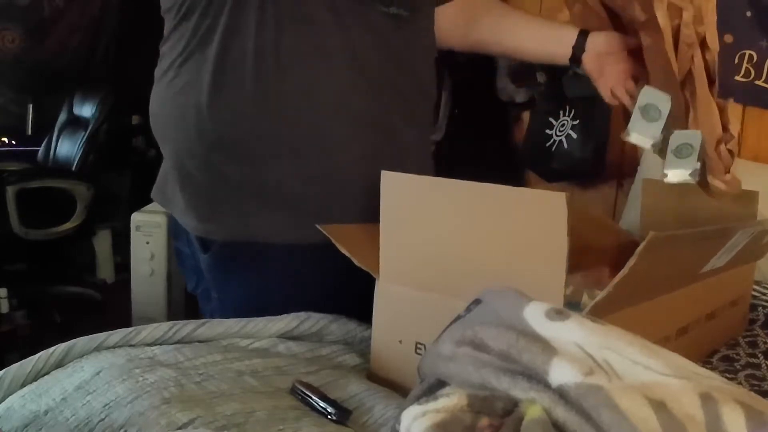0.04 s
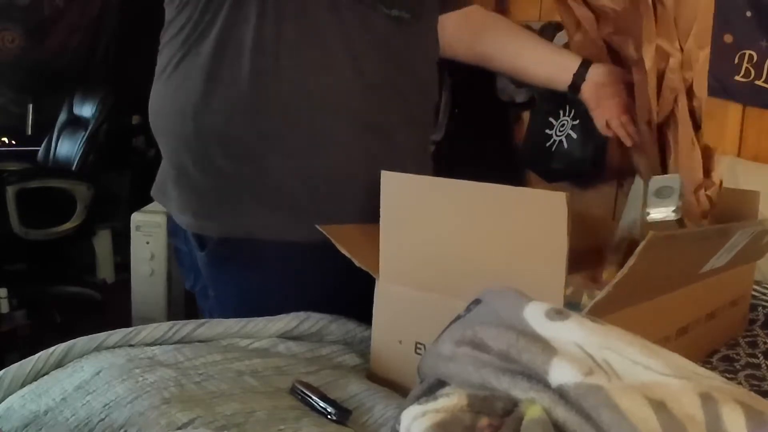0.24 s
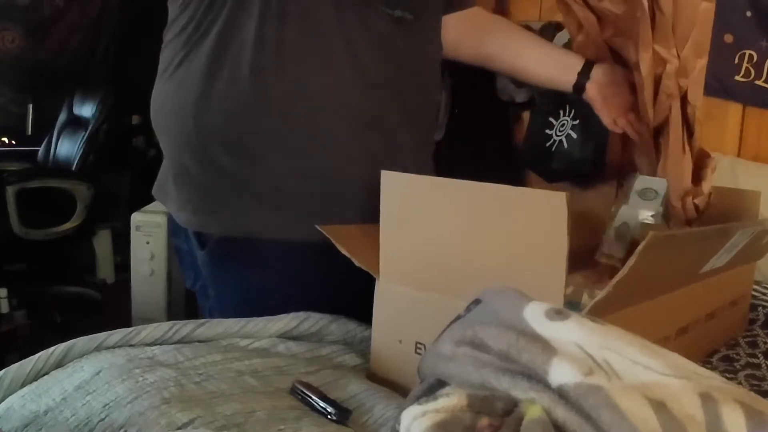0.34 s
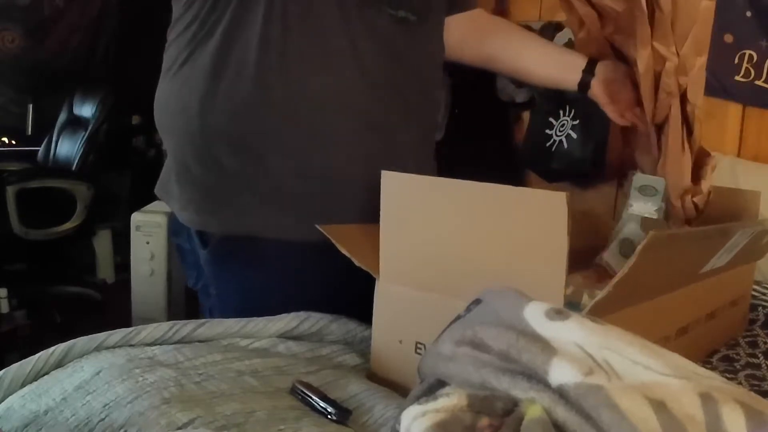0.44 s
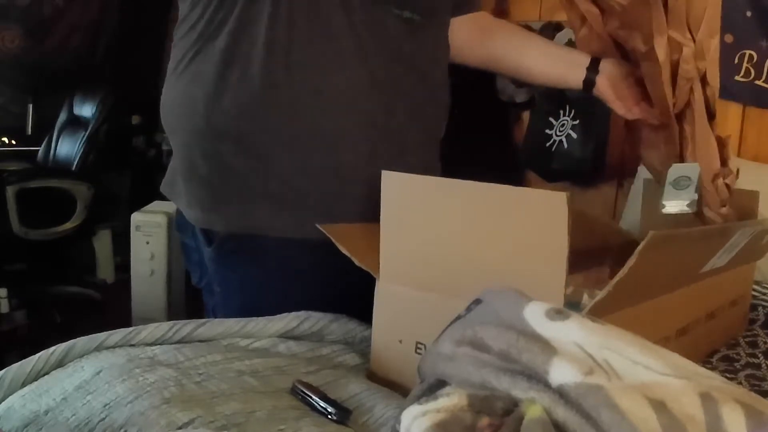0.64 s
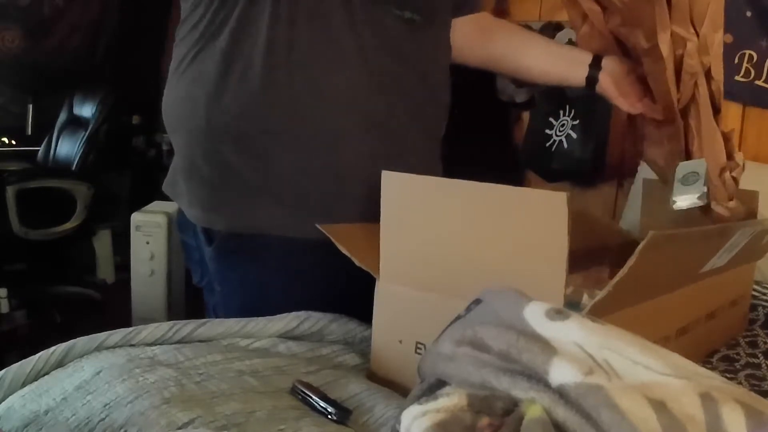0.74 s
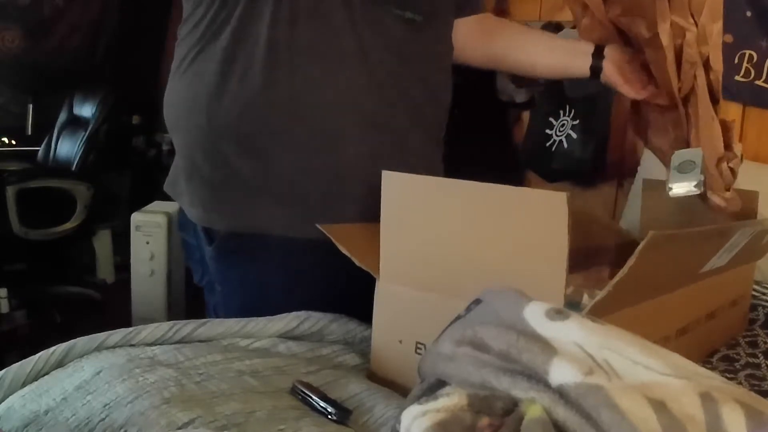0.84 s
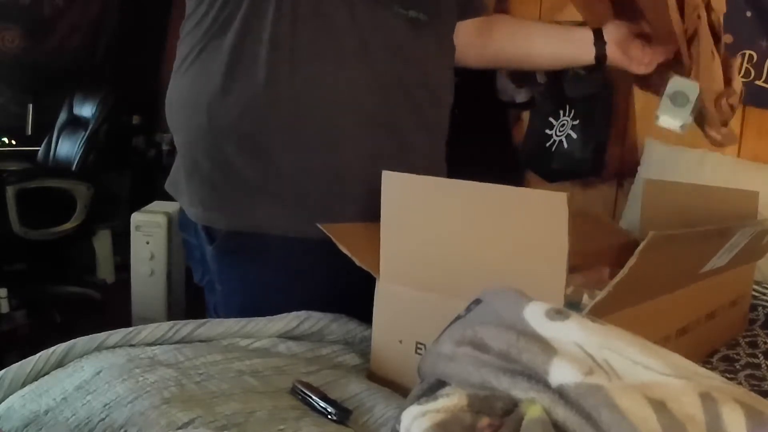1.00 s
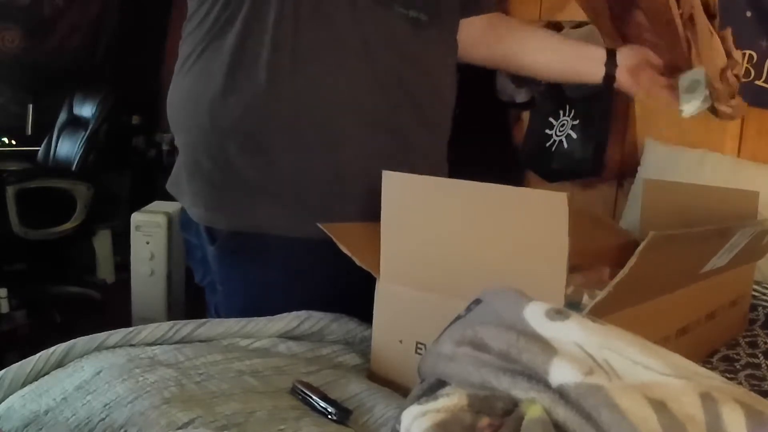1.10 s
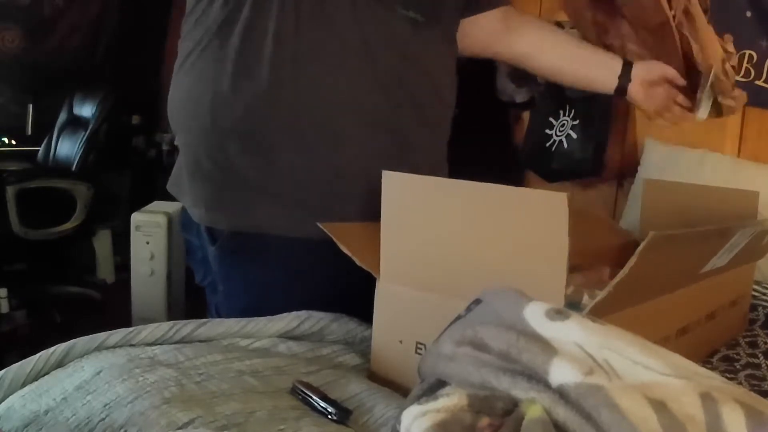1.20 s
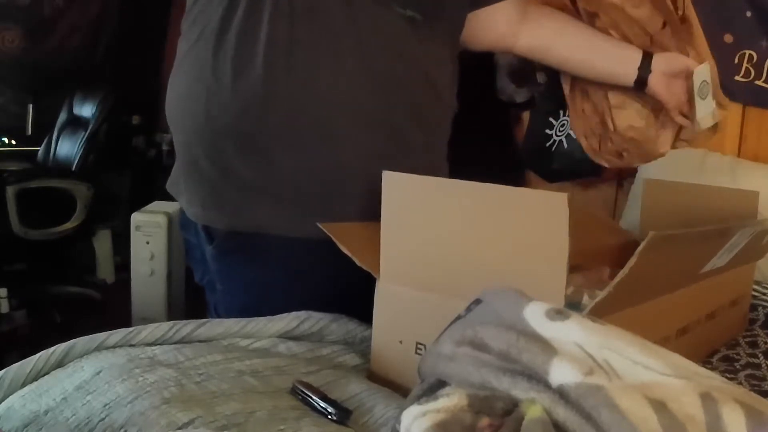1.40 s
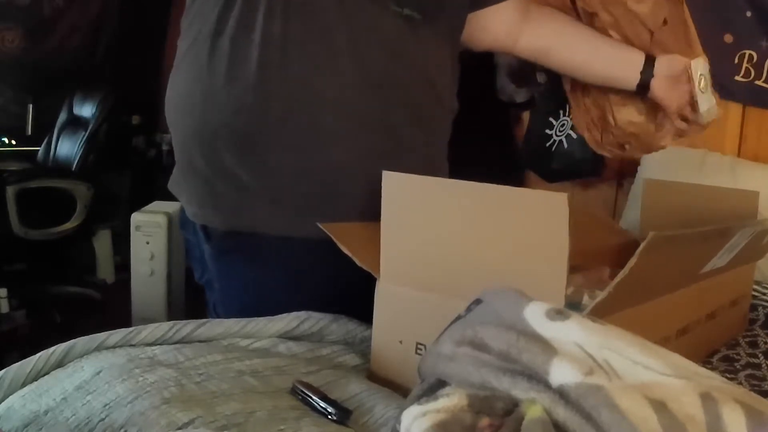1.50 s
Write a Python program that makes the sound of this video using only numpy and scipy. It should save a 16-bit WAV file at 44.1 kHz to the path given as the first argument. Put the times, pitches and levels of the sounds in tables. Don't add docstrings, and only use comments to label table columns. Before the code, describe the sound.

Brown packing paper rustles and crackles as it is pulled from a cardboard box, with dull knocks

```python
import sys
import numpy as np
from scipy import signal
from scipy.io import wavfile

SR = 44100
rng = np.random.default_rng(int(sys.argv[2]) if len(sys.argv) > 2 else 0)


def transcribe(u):
    v = np.clip(np.atleast_2d(u).T, -1, 1)
    q = np.round(v * 32767).astype(np.int16)
    wavfile.write(sys.argv[1], SR, q)


def gain_from_db(level_db):
    decades = np.asarray(level_db, float) / 20
    return 10 ** decades


N = 68355


def rms_one(x):
    return x / np.sqrt(np.mean(x ** 2) + 1e-20)


def at_hz(points, hz):
    table = np.array(points)
    return np.interp(np.log(hz), np.log(table[:, 0]), table[:, 1])


def clicks(start_s, gain):
    out = np.full(N, 1e-18)
    np.add.at(out, (np.asarray(start_s) * SR).astype(int), gain)
    return out


def ring(x, hz, t60):
    radius = gain_from_db(-60 / (t60 * SR))
    angle = 2 * np.pi * hz / SR
    return signal.lfilter([0, np.sin(angle)], [1, -2 * radius * np.cos(angle), radius * radius], x)


def fade(x, t60):
    return signal.lfilter([1], [1, -gain_from_db(-60 / (t60 * SR))], x)


def bandpass(x, low_hz, high_hz):
    return signal.sosfilt(signal.butter(2, [low_hz, high_hz], "band", fs=SR, output="sos"), x)


def highpass(x, hz):
    return signal.sosfilt(signal.butter(2, hz, "high", fs=SR, output="sos"), x)


def bands(low_hz):
    edges = low_hz * 2 ** np.arange(0, np.log2(17000 / low_hz), 0.5)
    settle = 4000
    white = rng.standard_normal((2, N + settle))
    for k, low in enumerate(edges):
        noise = bandpass(white[k % 2], low, min(low * 2 ** 0.5, 0.45 * SR))
        yield low * 2 ** 0.25, noise[settle:]


def drift(rate_hz):
    r = np.exp(-2 * np.pi * rate_hz / SR)
    slow = signal.lfilter([1], [1, -2 * r, r * r], rng.standard_normal(N + 20000))[20000:]
    return rms_one(slow - slow.mean())


# start_s [s], length_s [s], level_db [dB], brightness [dB per octave]
PULL_STROKES = [(-.05, 0.049, -55, -3), (0.05, 0.3, -72.5, -7), (0.293, 0.026, -61, -0.5),
                (0.423, 0.061, -63.5, -3), (0.845, 0.097, -64, 0), (0.919, 0.092, -63, 0),
                (1.022, 0.083, -61.5, 3), (1.086, 0.046, -56.5, 0.5), (1.211, 0.072, -67.5, 0),
                (1.259, 0.077, -57, 0), (1.332, 0.067, -59.5, -2), (1.41, 0.056, -59.5, 3),
                (1.462, 0.056, -63.5, 0.5)]


def pull():
    rise_s, t60_s, resting_db = 0.031, 0.19, -75
    start_s, length_s, level_db, brightness = (c[:, None] for c in np.transpose(PULL_STROKES))
    t = np.arange(N) / SR - start_s
    decay_db = 60 * np.clip(t - length_s, 0, 2) / t60_s
    gain = gain_from_db(level_db - decay_db) * np.clip(t / rise_s, 0, 1)
    total = gain.sum(axis=0) + gain_from_db(resting_db)
    return total, (gain * brightness).sum(axis=0) / total


# frequency_hz [Hz], density_db [dB per Hz]
PAPER_COLOUR = [(200, -7.5), (500, 0.5), (1100, 2), (2000, -2.5), (3400, -4), (5500, -30), (10000, -20),
                (15500, -28.5)]


def paper():
    grains_per_s, grain_spread_db, grain_cycles, clump_db = 4000, 2, 4.35, 1.5
    slide_db, slide_flutter_db = -3, 1.5
    gain, tilt = pull()
    sizes = gain_from_db(grain_spread_db * np.minimum(rng.exponential(1, N), 4)) * rng.choice([-1, 1], N)
    born = rng.random(N) < grains_per_s * gain_from_db(clump_db * drift(30)) / SR
    pitches_hz = np.geomspace(400, 14000, 24)
    dealt = rng.integers(0, 24, N)
    grains = np.zeros(N)
    for k, hz in enumerate(pitches_hz):
        octaves = np.log2(hz / 2000)
        colour_db = at_hz(PAPER_COLOUR, hz) + 20 * np.log10(hz / 2000) + tilt * octaves
        grains += gain_from_db(colour_db) * ring(sizes * born * (dealt == k) + 1e-18, hz, grain_cycles / hz)
    together = drift(16.0)
    slide = np.zeros(N)
    for hz, noise in bands(200.2):
        colour_db = at_hz(PAPER_COLOUR, hz) + tilt * np.log2(hz / 2000)
        flutter_db = slide_flutter_db * together + 4.5 * drift(23)
        slide += gain_from_db(colour_db + flutter_db) * noise
    return gain * gain_from_db(-4) * (rms_one(grains) + gain_from_db(slide_db) * rms_one(slide))


# frequency_hz [Hz], density_db [dB per Hz]
FLOOR_COLOUR = [(20, 3.5), (50, -7.5), (120, -16), (300, -23.5), (800, -33), (3000, -38), (8000, -45),
                (15500, -39)]
# start_s [s], level_db [dB]
BOX_SHIFT = [
    (0.8, -103),
    (0.826, -60),
    (0.9, -65),
    (0.918, -78),
    (1.328, -54.5),
    (1.40, -62.5),
    (1.51, -60),
    (1.545, -83),
]


def room_tone():
    t = np.arange(N) / SR
    floor = rms_one(sum(gain_from_db(at_hz(FLOOR_COLOUR, hz)) * noise for hz, noise in bands(21.26)))
    hum = gain_from_db(-64 + 0.4 * drift(11)) * np.sin(2 * np.pi * 120 * t)
    rumble = rms_one(bandpass(rng.standard_normal(N), 25, 85))
    rumble_db = np.interp(t, *np.transpose(BOX_SHIFT)) - 4.0
    return gain_from_db(-62) * floor + hum + gain_from_db(rumble_db) * rumble


# start_s [s], level_db [peak dB], pitch_hz [Hz], spray_s [s]
SNAPS = [(.083, -53, 1710, 0.06), (0.1217, -45.5, 2670, 0.087), (.1197, -61, 10260, .03),
         (.214, -63, 8800, 0.093), (.226, -55, 8800, 0.1), (.245, -50.5, 7860, 0.052),
         (0.315, -58, 8100, 0.016), (.44, -47.5, 1430, 0.059), (0.453, -50, 2260, 0.043),
         (.483, -52.5, 3150, .03), (0.676, -61, 8100, .05), (0.87, -61.5, 2770, 0.19),
         (0.874, -64, 1120, 0.021), (.902, -52, 1320, 0.026), (.534, -72, 8500, .03),
         (.534, -61, 2570, 0.027), (.001, -64, 5070, 0.037), (.927, -55, 3590, .02),
         (0.9345, -44, 2310, 0.019), (0.9379, -42.5, 2020, 0.027), (0.971, -50.5, 1170, 0.019),
         (0.962, -43, 1500, 0.046), (.99, -57, 2960, 0.045), (1.03, -57.5, 1110, 0.035),
         (1.055, -62, 1660, 0.022), (1.055, -55.5, 7800, .05), (1.075, -52.5, 1300, 0.042),
         (1.117, -50, 1500, 0.018), (1.127, -50, 1180, 0.041), (1.101, -56, 8500, 0.033),
         (1.103, -56, 2930, 0.16), (1.112, -60, 10500, .08), (1.124, -55.5, 11400, 0.11),
         (1.127, -54, 2930, 0.074), (1.212, -51, 1250, 0.055), (1.213, -54.5, 3200, 0.053),
         (1.259, -56, 1290, .03), (1.275, -54, 2530, 0.028), (1.295, -49.5, 1960, 0.05),
         (1.319, -53, 1500, 0.017), (1.352, -52, 1170, 0.046), (1.318, -57, 8900, 0.033),
         (1.441, -45.5, 1900, 0.044), (1.4555, -42, 2360, 0.055), (1.50, -85, 9000, .04),
         (1.518, -60, 9000, 0.022), (0.2144, -42, 3220, 0.046), (0.3743, -51.5, 3720, 0.026),
         (0.6498, -48, 3460, 0.048), (1.463, -52.5, 1500, .04)]


def snaps():
    cycles, spray_db, span, tick_db = 6.5, -6.5, 1.72, -2
    out = np.zeros(N)
    for start_s, level_db, pitch_hz, spray_s in SNAPS:
        hit = clicks([start_s], gain_from_db(level_db))
        low_hz, high_hz = pitch_hz / span, min(pitch_hz * span, 16000)
        spray = rms_one(bandpass(rng.standard_normal(N), low_hz, high_hz))
        body = ring(hit, pitch_hz, cycles / pitch_hz) + gain_from_db(spray_db) * spray * fade(hit, spray_s)
        out += bandpass(body, low_hz, high_hz)
        out += gain_from_db(tick_db) * ring(hit, min(2 * pitch_hz, 15000), 2.1 / pitch_hz)
    return out


def clinks(start_s, level_db, modes, share_db):
    out = np.zeros(N)
    for k, (hz, mode_db, t60) in enumerate(modes):
        hits = clicks(start_s, gain_from_db(level_db + mode_db + share_db[:, k]))
        out += gain_from_db(3 * drift(60)) * ring(hits, hz, t60)
    return out


# frequency_hz [Hz], level_db [dB], t60_s [s]
JAR_MODES = [(1320, -37, 0.03), (1500, -5, 0.055), (2430, -24, 0.048), (2466, -4, 0.099),
             (2770, -0.5, 0.13), (2733, -7.5, 0.087), (3630, -9.5, 0.048), (3620, -4.5, 0.044),
             (4270, -32, 0.025), (5560, -43, .06), (9350, -16, 0.015), (10470, -20.5, 0.065)]
# start_s [s], level_db [peak dB]
JAR_STRIKES = [
    (.1200, -43),
    (.128, -49.5),
    (0.215, -45.5),
    (0.319, -61.5),
]


def jar():
    start_s, level_db = np.transpose(JAR_STRIKES)
    share_db = -5 + 0.92 * rng.normal(0, 1, (len(start_s), len(JAR_MODES)))
    return clinks(start_s, level_db, JAR_MODES, share_db)


# start_s [s], level_db [peak dB], pitch_hz [Hz], swing_cycles [cycles], crack_db [dB]
BOX_KNOCKS = [(0.2132, -19.5, 120.4, 1.72, -33), (0.2138, -24.5, 240, 3.44, -19.5),
              (0.2128, -35.5, 935, 3.4, -30), (.2195, -26, 557, 2.52, -15.5), (0.2196, -31, 910, 2.96, -23),
              (0.231, -32, 414, 3.56, -19.5), (0.237, -30, 132, 1.77, -18.5), (0.244, -37, 390, 2.4, -23),
              (.257, -40.5, 216, 3.53, -13), (0.277, -41, 168, 1.2, -18), (0.2984, -36.5, 323, 1.5, -30),
              (0.3045, -35.5, 386, 2.08, -30), (0.3753, -33, 324, 0.9, -7.5),
              (0.382, -39.5, 480, 0.79, -10.5), (0.3828, -44, 300, 1.36, -21),
              (0.391, -49.5, 294, 1.73, -20), (0.4, -56, 410, 3.5, -30),
              (0.5327, -24.5, 206.3, 1.32, -29.5), (.5332, -39.5, 917, 3.2, -13.5),
              (0.5363, -35, 494, 2.66, -20.5), (0.5446, -36.5, 158.5, 1.6, -15.5),
              (0.546, -44, 960, 4.5, -32), (0.56, -40, 200, 1.07, -18), (0.5654, -39, 236, 0.92, -25),
              (0.566, -42.5, 397, 1.8, -17), (0.65, -22.5, 285, 1.75, -15.5),
              (.6573, -26.5, 229, 1.14, -41), (0.6554, -28.5, 401, 2.65, -26.5),
              (0.6546, -35, 930, 6, -8.5), (0.666, -37.5, 237, 2.07, -49), (.675, -36.5, 365, 2.4, -40),
              (0.685, -40.5, 250, 1.5, -49), (.701, -40, 220, 2.2, -44)]
# frequency_hz [Hz], level_db [dB], t60_s [s]
BOX_MODES = [(111, 17.5, 0.024), (141, -6.5, 0.1), (196, -1, 0.082), (239.9, 3.5, 0.14), (300, -17, 0.14),
             (344, 5.5, 0.051), (394.8, 3, 0.11), (480, -0.5, 0.08), (551, -7, 0.11), (605, -1.5, 0.14),
             (716, 2.5, 0.066), (850, 4, 0.07), (843, -3, 0.091), (974, -9.5, 0.16)]
# frequency_hz [Hz], density_db [dB per Hz]
CRACK_COLOUR = [(290, -29), (500, -9), (646, -10.5), (949, -11.5), (2390, -18.5), (3670, -27.5),
                (4290, -40.5), (15000, -49)]
# frequency_hz [Hz], t60_s [s]
CRACK_DECAY = [(500, 0.15), (2000, 0.093), (6000, 0.24), (14000, 0.056)]


def knocks():
    swing_edge_s, swing_loss_db, low_share = 0.00076, -1, 0.38
    afterring_db, reach_oct = -16, 0.62
    wobble_hz, wobble_db = 35, 4.0
    crack_rise_s, crack_s, crack_tail_db = 0.00045, 0.0034, -10
    start_s, level_db, pitch_hz, cycles, crack_db = np.transpose(BOX_KNOCKS)

    t = np.arange(N) / SR - start_s[:, None]
    phase_cycles = t * pitch_hz[:, None]
    overtime_s = np.clip(t - (cycles / pitch_hz)[:, None], 0, 1)
    envelope = np.exp(-overtime_s / swing_edge_s) * (t > 0)
    envelope = envelope * gain_from_db(level_db[:, None] + swing_loss_db * np.clip(phase_cycles, 0, 10))
    swing = -envelope * np.sin(2 * np.pi * phase_cycles)
    out = sum(highpass(row, low_share * hz) for hz, row in zip(pitch_hz, swing))

    chance = rng.normal(0, 1, (len(start_s), len(BOX_MODES)))
    ring_start_s = start_s + 0.694 * cycles / pitch_hz
    for k, (mode_hz, mode_db, t60) in enumerate(BOX_MODES):
        near_db = -6 * np.abs(np.log2(mode_hz / pitch_hz)) / reach_oct
        strike_db = level_db + afterring_db + mode_db + near_db + 2.0 * chance[:, k]
        strikes = clicks(ring_start_s, gain_from_db(strike_db) * np.sign(chance[:, k - 1]))
        out += gain_from_db(wobble_db * drift(wobble_hz)) * ring(strikes, mode_hz, t60)

    hits = clicks(start_s, gain_from_db(level_db + crack_db) / (crack_rise_s * SR))
    hits = fade(hits, crack_rise_s * np.log(1000))
    for hz, noise in bands(491):
        shape = fade(hits, crack_s * 7) + gain_from_db(crack_tail_db) * fade(hits, at_hz(CRACK_DECAY, hz))
        out += gain_from_db(at_hz(CRACK_COLOUR, hz) + 23.0) * noise * shape
    return highpass(out, 55.0)


# frequency_hz [Hz], level_db [dB], t60_s [s]
LID_MODES = [(2459, -6.5, 0.12), (2756, 2, 0.07), (3985, 1, 0.13), (4960, 8.5, 0.043), (5350, 8.5, 0.042),
             (6200, 10.5, 0.054), (7500, -20, .03)]
# start_s [s], level_db [peak dB], pitch_hz [Hz]
LID_TOUCHES = [(0.244, -58.5, 5540), (0.251, -57, 4350), (.322, -62.5, 2459), (.377, -59, 3985),
               (0.394, -52.5, 2459), (.559, -81, 6200), (0.56, -67, 3985), (0.655, -61, 3985),
               (0.677, -64, 5710), (0.689, -58, 2756), (0.711, -73, 2756)]


def lid():
    reach_oct = 0.11
    start_s, level_db, pitch_hz = np.transpose(LID_TOUCHES)
    away_oct = np.abs(np.log2(np.transpose(LID_MODES)[0] / pitch_hz[:, None]))
    return clinks(start_s, level_db, LID_MODES, -6 * away_oct / reach_oct)


def room(x):
    level_db, t60_s, gap_s = -14.5, 0.19, 0.0032
    t = np.arange(SR // 3) / SR
    echo = rng.standard_normal(len(t)) * gain_from_db(-60 * t / t60_s) * (t > gap_s)
    echo = bandpass(echo, 570, 6000)
    echo = echo / np.sqrt(np.sum(echo ** 2))
    return x + gain_from_db(level_db) * signal.fftconvolve(x, echo)[:N]


def scene():
    rustle = paper()
    background = room_tone()
    impacts = snaps() + jar() + knocks() + lid()
    return (room(impacts) + rustle + background)[None]


def top_cut(x):
    return signal.sosfilt(signal.butter(12, 15630, fs=SR, output="sos"), x)


def record(dry):
    cut = signal.sosfilt(signal.cheby2(12, 50, 16300, fs=SR, output="sos"), dry)
    mix = signal.sosfilt(signal.butter(2, 12240, fs=SR, output="sos"), cut)
    return top_cut(mix)


dry = scene()
out = record(dry)
transcribe(out)
```